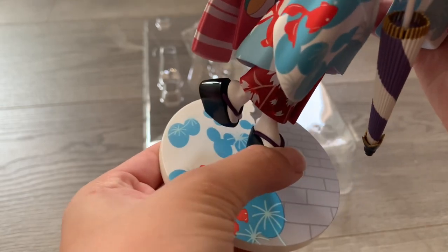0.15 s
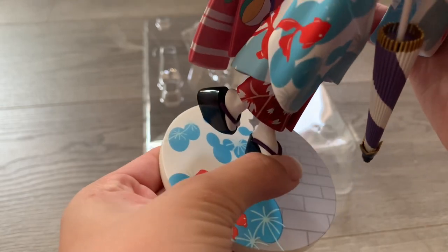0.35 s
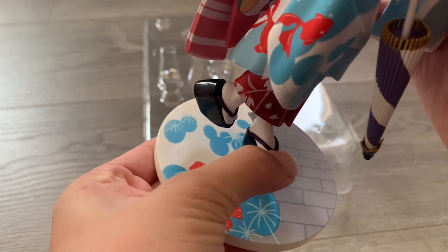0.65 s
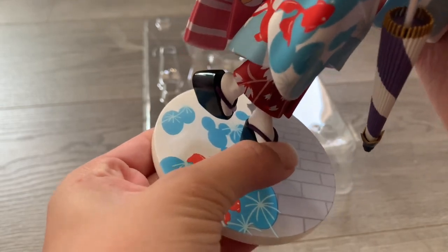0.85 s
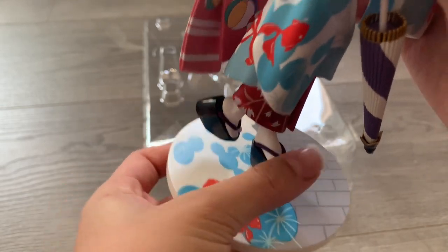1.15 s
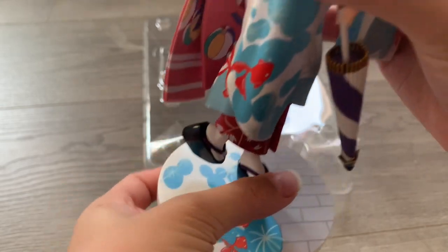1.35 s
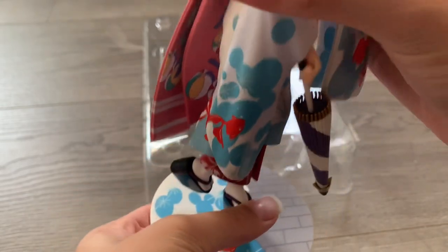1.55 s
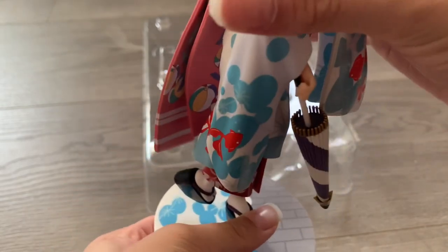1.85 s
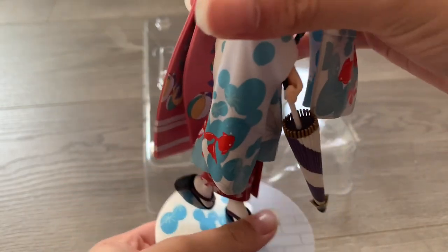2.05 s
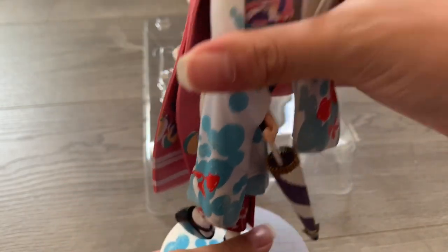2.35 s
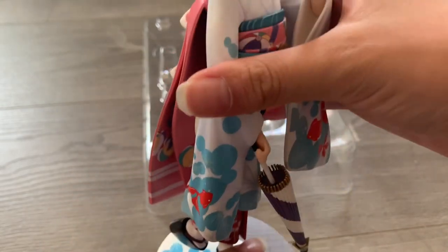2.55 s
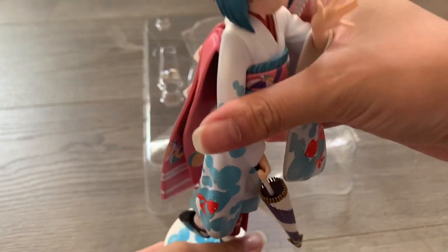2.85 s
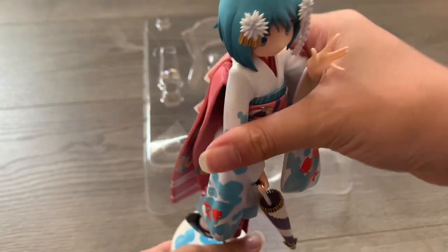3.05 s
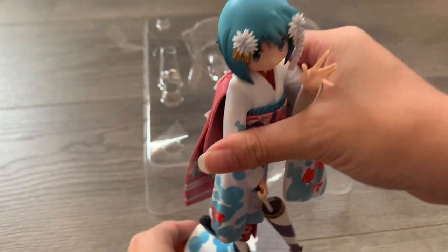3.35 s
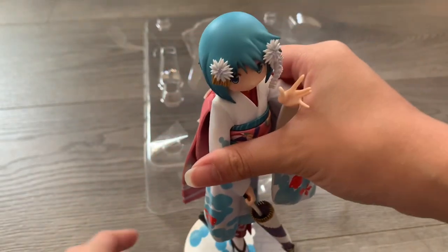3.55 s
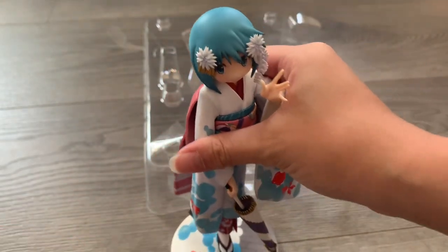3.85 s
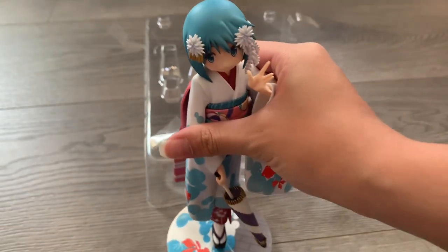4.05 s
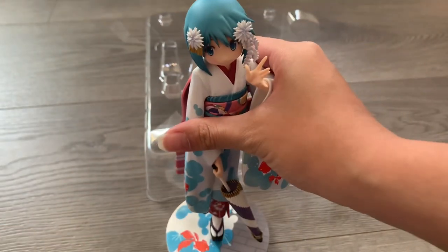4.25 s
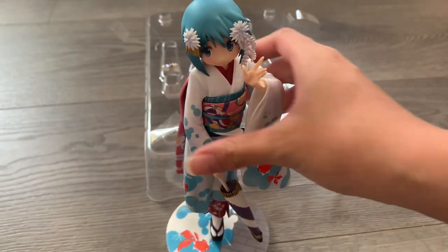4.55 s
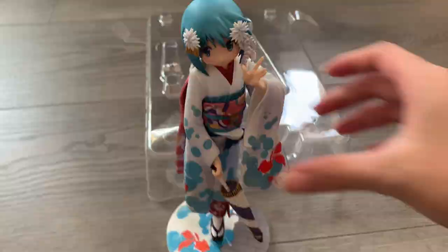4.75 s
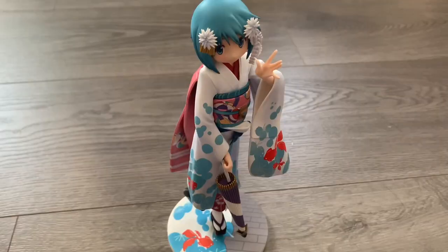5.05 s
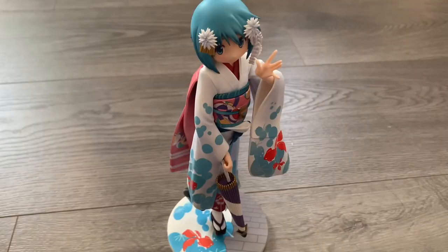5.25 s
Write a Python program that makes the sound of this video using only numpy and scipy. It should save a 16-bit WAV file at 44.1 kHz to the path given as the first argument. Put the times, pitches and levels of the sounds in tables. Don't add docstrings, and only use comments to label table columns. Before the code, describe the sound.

Close stereo microphone in a quiet room with a short echo. Sparse plastic ticks and squeaky finger rubs come first, then a sharp, bright snap just past the middle, much the loudest sound. A hollow knock, a set-down and a brief grating slide over floorboards follow. A heavy engine rumbles low through the wall, rising and dropping with gear shifts, then cuts off near the end, leaving quieter air and tiny nail ticks.

```python
import sys
import numpy as np
from scipy import signal
from scipy.fft import rfft, irfft
from scipy.io import wavfile
from scipy.ndimage import uniform_filter1d

SR = 44100
rng = np.random.default_rng(int(sys.argv[2]) if len(sys.argv) > 2 else 0)


def ratio(d):
    e = np.asarray(d, float) / 20
    return 10 ** e


def log_audio(samples):
    frames = np.atleast_2d(samples).T
    limited = np.clip(frames, -1, 1)
    pcm = np.round(limited * 32767).astype(np.int16)
    wavfile.write(sys.argv[1], SR, pcm)


N = 237977

SCENE_CHANGE_S = 4.8189
QUIETER_AFTER_CHANGE_DB = -7
RING_SAMPLES = 2600


def rms_one(x):
    return x / np.sqrt(np.mean(x ** 2) + 1e-20)


def in_time(rows):
    s, *columns = np.transpose(rows)
    return np.array([np.interp(np.arange(N) / SR, s, c, left=-120, right=-120) for c in columns])


def at_hz(points, hz):
    return np.interp(np.log(hz), np.log(np.array(points)[:, 0]), np.array(points)[:, 1])


def band_pass(x, low_hz, high_hz):
    return signal.sosfilt(signal.butter(2, [low_hz, high_hz], "band", fs=SR, output="sos"), x)


def drift(rate):
    r = np.exp(-80 * np.pi * rate / SR)
    slow = signal.lfilter([1], [1, -2 * r, r * r], rng.standard_normal(N // 40 + 2002))[2000:]
    return np.interp(np.arange(N) / 40, np.arange(len(slow)), rms_one(slow))


def resonate(x, peaks):
    out = 0
    for k, (hz, width_hz, level_db) in enumerate(peaks):
        r = np.exp(-np.pi * width_hz / SR)
        top = np.sqrt(1 - r * r) * ratio(level_db) * (-1) ** k
        out = out + signal.lfilter([top, 0, -top], [1, -2 * r * np.cos(2 * np.pi * hz / SR), r * r], x)
    return rms_one(out)


def grains(per_s, spread_db):
    sizes = ratio(spread_db * np.minimum(rng.exponential(1, N), 4)) * rng.choice([-1, 1], N)
    return sizes * (rng.random(N) < per_s / SR) + 1e-18


def coloured(x, spectrum):
    hz = np.fft.rfftfreq(N, 1 / SR) + 1
    return rms_one(irfft(rfft(x) * ratio(at_hz(spectrum, hz)), N))


def struck(modes, draws):
    t = np.arange(RING_SAMPLES)[:, None] / SR
    hz, level_db, t60 = np.transpose(modes)
    tune, strength = draws[:len(hz)], draws[-len(hz):]
    decay = ratio(level_db + 2.0 * strength - 60 * t / t60)
    rings = decay * np.sin(2 * np.pi * hz * (1 + .02 * tune) * t)
    blow = rings.sum(axis=1) * np.minimum(t[:, 0] / 0.00044, 1)
    return blow / np.abs(blow).max()


def strokes(rows, shape):
    share, swell_db = np.transpose(shape)
    curves = []
    for s, length, *levels in rows:
        columns = [s + share * length] + [db + swell_db for db in levels]
        curves.append(in_time(np.column_stack(columns)))
    return np.max(curves, axis=0)


# time in seconds, peak in dB, body ring in Hz, crack in dB.
JOINT_TICKS = [(0.2661, -58.5, 1880, -64), (0.3066, -63, 1520, -68.5), (0.3545, -61, 1820, -72.5),
               (0.756, -59, 1890, -68.5), (1.0846, -48, 2000, -60), (1.1069, -47.5, 2020, -100),
               (1.213, -55.5, 2270, -86), (1.2522, -82, 1600, -70), (1.266, -50.5, 2100, -98),
               (1.4865, -53, 2200, -63.5), (1.494, -54, 2320, -66.5), (1.508, -53, 2060, -68),
               (2.043, -66.5, 1480, -73), (2.1061, -48.5, 2280, -63), (2.466, -52, 1592, -68.5),
               (2.5149, -57, 1980, -94), (2.585, -51.5, 1660, -78.5), (2.6176, -60, 1650, -82.5),
               (2.7322, -62.5, 1510, -46), (2.7448, -67.5, 1480, -56), (2.7512, -42, 1800, -55),
               (2.9327, -50.5, 2030, -72.5), (3.1757, -38.5, 2460, -58.5), (3.7416, -36.5, 1520, -75)]
# time in seconds, peak in dB, body ring in Hz,
# crack in dB, thud in dB.
KNOCKS = [(0.6175, -41.5, 1850, -58.5, -51), (0.6243, -47, 1740, -64, -45), (0.6406, -45, 1830, -61.5, -42),
          (1.5144, -50.5, 2180, -66, -58), (2.6957, -55, 1631, -54, -58), (3.0919, -24.5, 2090, -49.5, -52),
          (3.3084, -39, 2180, -90.5, -68), (3.4419, -61, 2370, -76, -61), (3.796, -39.5, 810, -80, -51),
          (4.1655, -29, 2100, -46, -29), (4.9922, -54, 1840, -79.5, -50.5), (5.0088, -82, 1460, -89, -44)]
# time in seconds, crack in dB, shell ring in Hz.
NAIL_TICKS = [
    (2.674, -70.5, 9020),
    (2.709, -57, 10530),
    (4.6425, -69.5, 10170),
    (4.712, -75, 3020),
    (4.732, -77.5, 4530),
    (5.302, -61.5, 8100),
    (5.3258, -57, 8930),
    (5.383, -59, 10800),
]
# pitch in Hz, level in dB, t60 in seconds.
BODY_MODES = [(1390, -15, 0.0027), (2100, -4.5, 0.017), (3270, -18, 0.0067)]
SHELL_MODES = [(5350, -13.5, 0.0052), (7490, -3, 0.0045), (8760, -3.5, 0.013), (13100, -3.5, 0.0028)]
PLATE_MODES = [(341, 1.5, 0.1), (473, 7.5, 0.015), (665, -5, 0.0027)]
SHELL_HZ, SHELL_SCATTER = 7400, 0.12
SOFT_BELOW_DB, SOFT_SLOPE = -25, 1
TICK_THUD_DB = -66


def ticks():
    hits = [row + (TICK_THUD_DB, 0) for row in JOINT_TICKS]
    hits += [row + (0,) for row in KNOCKS]
    hits += [(s, -120, 2000, crack_db, -120, hz) for s, crack_db, hz in NAIL_TICKS]
    out, draws = np.zeros(N + RING_SAMPLES), rng.standard_normal((len(hits), 3, 12))
    fade = ratio(-60 * np.arange(RING_SAMPLES) / SR / .022)
    cracks = band_pass(rng.standard_normal((len(hits), RING_SAMPLES)) * fade, 2800, 13500)
    for hit, (body_draw, shell_draw, plate_draw), crack in zip(hits, draws, cracks):
        s, body_db, body_hz, crack_db, thud_db, shell_hz = hit
        lead_db = 7 if shell_hz else 0
        shell_hz = shell_hz or SHELL_HZ * np.exp(SHELL_SCATTER * plate_draw[5])
        soft_db = SOFT_SLOPE * max(SOFT_BELOW_DB - crack_db + body_db, 0)
        body = struck([(body_hz, soft_db, .014)] + BODY_MODES, body_draw)
        shell = struck([(shell_hz, lead_db, .012)] + SHELL_MODES, shell_draw)
        shell = shell + 1.2 * ratio(-lead_db) * crack / np.abs(crack).max()
        plate = struck(PLATE_MODES, plate_draw)
        at = round((s + .0011) * SR)
        blow = ratio(body_db) * body + ratio(thud_db + 5.0) * plate + ratio(crack_db + 8.0) * shell
        out[at:at + RING_SAMPLES] += blow
    return out[:N]


FLOOR_ECHO_S, FLOOR_ECHO_DB = 0.004, -18.5


def clear_blow(s, level_db, modes, rattle_db):
    out, at = np.zeros(N), round(s * SR)
    fade = ratio(rattle_db - 60 * np.arange(RING_SAMPLES) / SR / 0.041)
    rattle = np.diff(rng.standard_normal(RING_SAMPLES + 1)) * fade
    rattle = signal.lfilter([.5], [1, -.6], rattle)
    out[at:at + RING_SAMPLES] = ratio(level_db) * (struck(modes, np.zeros(12)) + rattle)
    return out + ratio(FLOOR_ECHO_DB) * np.roll(out, round(FLOOR_ECHO_S * SR))


# pitch in Hz, level in dB, t60 in seconds.
PEG_MODES = [(440, -9, 0.008), (1480, -3, 0.007), (1786, -2, 0.0054), (2120, -2.5, 0.0038),
             (3510, 0, 0.004), (5310, -7.5, 0.0046), (7900, -9.5, 0.004), (9800, -9, 0.0024),
             (11450, -7, 0.005)]


def peg_snap():
    return clear_blow(2.7567, -4.5, PEG_MODES, rattle_db=-15.5)


# pitch in Hz, level in dB, t60 in seconds.
LANDING_MODES = [(1260, -8, 0.03), (2180, 5, 0.018), (3925, -13, 0.025), (5340, -20.5, 0.038),
                 (6570, -18, 0.018), (8140, -9, 0.0058), (11650, -6.5, 0.0052)]


def landing():
    return clear_blow(3.6928, -24, LANDING_MODES, rattle_db=-23)


# time in seconds, peak in dB, pitch in Hz,
# length in cycles.
PINGS = [(0.618, -46, 3270, 24), (0.625, -54, 4450, 22), (0.641, -54, 2520, 20.0), (1.266, -56, 2090, 26),
         (2.932, -57.5, 4000, 30.0), (3.091, -39, 4460, 21), (3.307, -47, 2130, 36), (1.487, -56, 2200, 18),
         (1.53, -57.5, 2200, 30.0), (2.806, -42, 1800, 22), (2.817, -47, 1790, 20.0),
         (3.25, -63.5, 3484, 78), (3.27, -61.5, 7980, 150.0), (3.794, -45, 870, 14.2),
         (5.326, -53, 4720, 30.0), (1.123, -53, 2000, 33), (1.142, -55, 2030, 35), (1.151, -60, 2030, 25.0),
         (1.179, -72, 2080, 24), (2.697, -38, 9300, 42), (2.725, -56, 13400, 60.0),
         (2.734, -41, 9400, 50.0), (2.747, -32, 9100, 62), (2.771, -39, 1900, 25.0), (2.788, -41, 1700, 28),
         (3.07, -56, 1730, 25.0), (3.108, -45, 2050, 30.0), (3.122, -45, 2100, 30.0),
         (3.262, -52, 2100, 50), (3.2717, -39, 2100, 26), (3.29, -58, 2100, 27), (3.357, -50, 2136, 26),
         (3.3785, -50, 2070, 34), (3.708, -42.5, 2000, 32), (3.8769, -44, 1490, 20.0),
         (3.908, -52, 9400, 32), (3.9595, -41, 1610, 20.0), (3.973, -34, 210, 6.3), (3.995, -38, 183, 7.0),
         (4.013, -49, 13000, 44), (4.103, -50, 6520, 30.0), (4.115, -33.5, 2000, 20.0),
         (4.117, -34, 608, 9.7), (4.169, -26, 227, 5.1), (5.296, -62, 13560, 84), (5.302, -55, 8360, 60.0),
         (5.303, -62, 13400, 70.0), (5.31, -67, 8200, 50.0), (5.321, -54, 13500, 83),
         (5.327, -38.5, 8560, 66), (5.328, -54, 5700, 40.0), (5.389, -57, 10400, 60.0)]
PING_RISE_CYCLES = 3.0


def pings():
    out, t = np.zeros(N + RING_SAMPLES), np.arange(RING_SAMPLES) / SR
    for s, db, hz, cycles in PINGS:
        at, rise = round(s * SR), min(PING_RISE_CYCLES, cycles / 6)
        swell = 1 - np.exp(-(t * hz / rise) ** 2)
        decay = ratio(db + 7.0 - 60 * t * hz / cycles)
        out[at:at + RING_SAMPLES] += decay * swell * np.sin(2 * np.pi * hz * t)
    return out[:N]


# start in seconds, length in seconds, boards in dB, plate in dB.
PUSHES = [
    (3.42, 0.12, -58.5, -72.5),
    (3.69, 0.23, -93, -59),
    (3.775, 0.063, -66, -52.5),
    (3.85, 0.11, -72, -61),
    (3.885, 0.17, -52, -46.5),
    (3.92, .15, -37, -45),
    (4.04, 0.22, -39.5, -48),
    (4.12, 0.11, -39, -45),
    (4.2, 0.13, -45.5, -62),
]
# share of its length, level in dB.
PUSH_SHAPE = [(0, -7), (0.299, 3.5), (.6, -0.5), (1, -19)]
# pitch in Hz, width in Hz, level in dB.
BOARDS = [(155, 12, 0), (212, 31.14, 0), (284, 93, 3.5), (450, 210, 5), (675, 84, 2.5)]
BASE_PLATE = [(863, 250, 3), (1012, 280, 5), (1240, 180, 2.5), (1520, 300, -1.5), (2036, 400, -0.5),
              (2250, 800, -16.5)]


def slide():
    boards_db, plate_db = strokes(PUSHES, PUSH_SHAPE)
    judder = grains(4000, 0.75) * ratio(1.8 * drift(26))
    return ratio(boards_db) * resonate(judder, BOARDS) + ratio(plate_db) * resonate(judder, BASE_PLATE)


def slide_width():
    upper = signal.sosfilt(signal.butter(2, 350, "high", fs=SR, output="sos"), slide())
    return ratio(-9) * upper * [[1], [-1]]


# start in seconds, length in seconds, body in dB, wall in dB,
# skin hiss in dB.
RUBS = [(0.99, 0.065, -88, -97, -73.5), (1.06, 0.068, -66, -82, -83), (1.10, 0.065, -61.5, -94, -97),
        (1.12, 0.039, -80, -72, -65), (1.47, .13, -69.5, -75.5, -65.5), (1.77, 0.17, -84.5, -76, -89),
        (2.09, 0.036, -61.5, -75, -63), (2.694, 0.044, -85, -76, -53), (2.725, 0.017, -62, -59, -68),
        (2.915, 0.1, -64, -76, -71.5), (3.0, 0.11, -86, -65, -68.5), (3.09, 0.11, -61, -67, -65.5),
        (3.19, 0.14, -64, -85, -68), (3.24, 0.18, -55.5, -74, -62), (3.43, 0.078, -81.5, -75.5, -72),
        (3.68, 0.14, -55, -59.5, -61), (3.74, 0.13, -60, -84, -65.5), (3.8, 0.15, -64, -90, -75),
        (3.885, 0.27, -58.5, -56.5, -61.5), (4.05, 0.21, -60, -55.5, -61.5), (5.14, 0.36, -85, -75, -73),
        (5.285, 0.13, -94.5, -83, -59.5), (5.35, 0.17, -84, -94, -56.5)]
# share of its length, level in dB.
RUB_SHAPE = [(0, -16), (.25, -2), (.55, -6), (1, -17)]
# pitch in Hz, width in Hz, level in dB.
RUB_BODY = [(2110, 170, 0)]
RUB_WALL = [(2720, 1200, 0), (3420, 220, 0), (3800, 550, -2.5)]


def rubbing():
    body_db, wall_db, _ = strokes(RUBS, RUB_SHAPE)
    slips = grains(1800, 3.4) * ratio(2.7 * drift(36))
    fine = grains(5000, 1.4) * ratio(3.5 * drift(30))
    squeak = resonate(resonate(slips, RUB_BODY), RUB_BODY)
    rasp = resonate(resonate(fine, RUB_WALL), RUB_WALL)
    return ratio(body_db) * squeak + ratio(wall_db) * rasp


# pitch in Hz, level in dB per Hz.
SKIN = [(2940, -39), (4200, -13.5), (4750, -20.5), (5300, -14.5), (7940, -9.5), (8580, -10), (11900, -13.5),
        (13800, -10), (15200, -18)]


def skin_hiss():
    hiss_db = strokes(RUBS, RUB_SHAPE)[2]
    return ratio(hiss_db + 1.9 * drift(40)) * [coloured(grains(16000, 1.8), SKIN) for side in range(2)]


# start in seconds, level in dB, t60 in
# seconds.
WASHES = [
    (1.921, -46.5, 0.29),
    (2.761, -57, 0.39),
    (3.093, -59.5, 0.46),
]
# pitch in Hz, level in dB per Hz.
WASH_COLOUR = [(410, -34), (700, -6.5), (931, 0), (1270, -7), (3450, -6.5), (4580, -15), (10500, -15),
               (11800, -20.5), (13400, -19.5), (15500, -76)]


def wash():
    t = np.arange(N) / SR
    envelope = sum((t > s) * ratio(db - 60 * np.maximum(t - s, 0) / t60) for s, db, t60 in WASHES)
    return envelope * [coloured(white, WASH_COLOUR) for white in rng.standard_normal((2, N))]


# pitch in Hz, left lead in radians.
HANDS_LEAD = [(0, 0), (1500, .7), (3000, 2.1), (4200, .6), (5200, -2.2), (6300, .6), (7100, 0)]
PEG_LEAD = [(0, 0), (2070, .8), (2580, 2.2), (2840, 1.7), (5170, 5.3), (6120, 8.2), (7670, 8), (9300, 6.5)]
# pitch in Hz, left over right in dB.
SHADOW = [(60, -5.5), (110, -3.5), (200, -1.5), (380, -0.5), (700, -1), (1290, 3.5), (2380, 6.5), (4400, 1),
          (8120, -1), (15000, -3.5)]


def ports(x, lead):
    hz = np.fft.rfftfreq(N, 1 / SR) + 1
    gap = np.exp(.5j * np.interp(hz, *np.transpose(lead))) * ratio(at_hz(SHADOW, hz) / 2)
    return irfft(rfft(x) * [gap, 1 / gap], N)


# pitch in Hz, t60 in seconds.
ROOM_TAIL = [(300, 0.33), (1500, 0.26), (4000, 0.26), (14000, .2)]
ROOM_DB = -13


def room(x):
    t, tail, edges = np.arange(SR // 2) / SR, 0, 200 * 2 ** np.arange(0, 6.6, .5)
    white = rng.standard_normal((2, len(t)))
    for low, high in zip(edges, edges[1:]):
        t60 = at_hz(ROOM_TAIL, np.sqrt(low * high))
        tail = tail + band_pass(white, low, high) * ratio(-60 * t / t60)
    tail = tail * np.clip((t - .002) / 0.0049, 0, 1)
    return signal.fftconvolve(x[None], tail / np.sqrt(np.sum(tail ** 2) / 2), axes=1)[:, :N]


def thump():
    since = np.arange(N) / SR - 5.34
    swell = np.exp(-(since / 0.032) ** 2)
    return ratio(-43.5) * swell * np.sin(2 * np.pi * 56 * since)


# time in seconds, cycle rate in Hz.
ENGINE_SPEED = [(0.0, 22.2), (0.2, 23.0), (0.4, 24.6), (0.6, 25.4), (0.8, 27.1), (1.1, 25.8), (1.3, 25.6),
                (1.45, 24.4), (1.6, 22.0), (1.75, 18.4), (1.85, 18.0), (2.1, 19.2), (2.7, 21.4),
                (3.1, 23.8), (3.3, 24.4), (4.05, 28.9), (4.2, 25.6), (4.82, 20.3)]
# time in seconds, load in dB, order 5 over order 4 in dB.
ENGINE_LOAD = [(0.0, -32.5, 2), (.3, -37, 8.5), (.45, -40, -1), (.85, -36, 2.5), (1.05, -39.5, -7.5),
               (1.3, -50, 5), (1.55, -40.5, 7), (1.78, -35.5, -3), (1.86, -32.5, -18.5), (2.7, -27.5, -18),
               (2.9, -38, 2), (3.15, -37, 9), (3.35, -37, -2.4), (3.75, -31.5, -3.5), (4.02, -35.5, -4),
               (4.2, -39.5, -4), (4.5, -44, -6.5), (4.82, -36, -33.5)]
SIDE_ORDERS = {2: -28.5, 3: -18, 6: -21, 7: -10, 8: -20.5}
# pitch in Hz, level in dB.
WALL = [(35, -44), (55, -27), (68, -10.5), (80, -5.5), (95, -4), (110, -9), (125, -1.5), (140, -13.5),
        (190, -22)]
OVERRUN_DB = 14


def engine():
    load_db, lean_db = in_time(ENGINE_LOAD)
    cycle_hz = np.maximum(in_time(ENGINE_SPEED)[0], 1)
    turn = 2 * np.pi * np.cumsum(cycle_hz) / SR
    orders = {4: -np.maximum(lean_db, 0), 5: np.minimum(lean_db, 0), **SIDE_ORDERS}
    slowing = uniform_filter1d(1. * (np.gradient(cycle_hz) < 0), size=SR // 10)
    orders[3] = orders[3] + OVERRUN_DB * slowing
    out = 0
    for k, order_db in orders.items():
        level = ratio(load_db + order_db + at_hz(WALL, k * cycle_hz) + 1.4 * drift(5.4))
        out = out + level * np.sin(k * turn + 0.042 * drift(8.7) + k * k)
    return np.sqrt(2) * out * (np.arange(N) < SCENE_CHANGE_S * SR)


def change_tick():
    step = np.zeros(N)
    step[round(SCENE_CHANGE_S * SR)] = ratio(-52.5)
    return signal.lfilter([1], [1, -.8], step)


# pitch in Hz, level in dB.
HUM = [(57, -63), (100, -61), (140, -70), (200, -60)]


def hum():
    t, out = np.arange(N) / SR, 0
    quieter_db = QUIETER_AFTER_CHANGE_DB * (t > SCENE_CHANGE_S)
    for hz, db in HUM:
        level = ratio(db + quieter_db + 4.0 * drift(1.9))
        out = out + level * np.sin(2 * np.pi * hz * t + 1.1 * drift(1.6))
    return out


# pitch in Hz, width in Hz, level in dB.
DUCT = [(772, 80, 0.5), (879, 33, -1), (948, 23, -1)]


def duct():
    return ratio(-70.5) * np.array([resonate(white, DUCT) for white in rng.standard_normal((2, N))])


# pitch in Hz, level in dB.
AIR = [(15, -47), (25, -24), (74, -5.5), (102, -4.5), (353, -26), (584, -36.5), (916, -37.5), (1070, -36.5),
       (1730, -57.5), (8690, -65), (10200, -54.5), (11900, -69.5), (14000, -63.5)]
# pitch in Hz, left-right likeness.
LIKENESS = [(60, 0.91), (180, 0.97), (550, 0.17), (1650, -0.4), (4970, -1.3), (15000, 0.23)]
# time in seconds, level in dB.
TRAFFIC = [(0.0, 2), (.18, -2), (1.37, 3), (1.5, -1.5), (1.83, 5.5), (2.31, -10), (2.58, 2), (2.7, -1),
           (3.3, 2.5), (3.8, 0.5), (4.0, 5), (4.12, -3), (4.5, 2), (5.02, -1.5), (5.4, 2.5)]
AIR_DB, AIR_TOP_HZ = -47.5, 14300


def air():
    deep_db = in_time(TRAFFIC)[0]
    rumble_db = QUIETER_AFTER_CHANGE_DB * (np.arange(N) > SCENE_CHANGE_S * SR)
    out, edges = 0, 25 * 2 ** np.arange(0, 9.6, .5)
    white = rng.standard_normal((2, 2, N))
    for k, (low, high) in enumerate(zip(edges, edges[1:])):
        mid, side = band_pass(white[k % 2], low, high)
        hz = np.sqrt(low * high)
        alike = np.clip(at_hz(LIKENESS, hz), 0, 1)
        if hz < 100:
            swell_db = deep_db * (hz > 50)
        else:
            swell_db = rumble_db * np.exp(-np.log2(hz / 280) ** 2)
        gain = ratio(at_hz(AIR, hz) + swell_db + 2.3 * drift(4.2))
        out = out + gain * (np.sqrt(1 + alike) * mid + np.sqrt(1 - alike) * side * [[1], [-1]])
    top_cut = signal.butter(8, AIR_TOP_HZ, fs=SR, output="sos")
    return ratio(AIR_DB) * rms_one(signal.sosfilt(top_cut, out))


def scene():
    peg = peg_snap()
    hands = ticks() + landing() + pings() + rubbing() + slide()
    close = ports(hands, HANDS_LEAD) + ports(peg, PEG_LEAD)
    wide = ratio(ROOM_DB) * room(hands + peg) + skin_hiss() + wash() + air() + duct() + slide_width()
    street = (engine() + hum() + thump()) * ratio([[-1.2], [1.2]])
    return close + wide + street + change_tick()


def roll_off(x):
    return signal.sosfilt(signal.butter(12, 16400, fs=SR, output="sos"), x)


# pitch in Hz, level in dB.
MIX_TONE = [(20, -5), (45, 0), (8300, 0.5), (8650, -5), (9000, 1), (11100, -1), (11700, -4), (12300, -2),
            (14200, 0), (14700, -10.5), (15900, -11), (16300, -27.5)]
MERGE_HZ = (7500, 10000)
LAG_ZERO_HZ, LAG_TURN_HZ = 7100, 3100


def record(dry):
    hz = np.fft.rfftfreq(N, 1 / SR)
    share = .96 * np.interp(hz, MERGE_HZ, [0, 1])
    left, right = rfft(dry) * ratio(at_hz(MIX_TONE, hz + 1))
    lag = np.exp(-1j * np.pi * np.maximum(hz - LAG_ZERO_HZ, 0) / LAG_TURN_HZ)
    merged = np.array([left, share * left + np.sqrt(1 - share ** 2) * right]) * [lag, 1 / lag]
    top_cut = signal.cheby2(10, 40, 16500, fs=SR, output="sos")
    mix = signal.sosfilt(top_cut, irfft(merged, N))
    mix = mix * np.clip((N - np.arange(N)) / (.002 * SR) - .4, 0, 1)
    return roll_off(mix)


dry = scene()
out = record(dry)
log_audio(out)
```